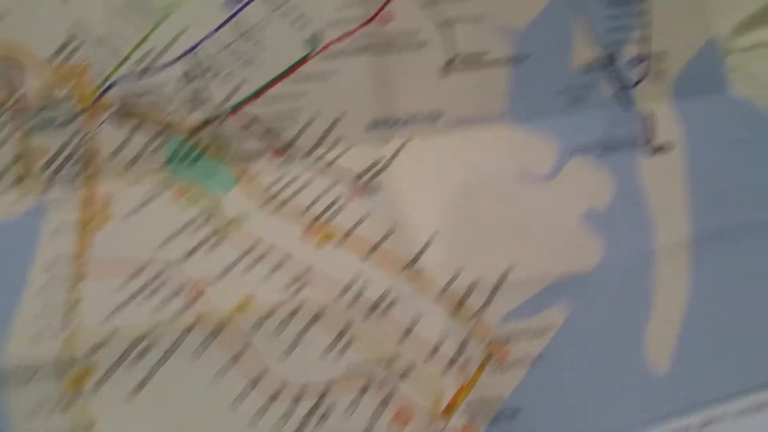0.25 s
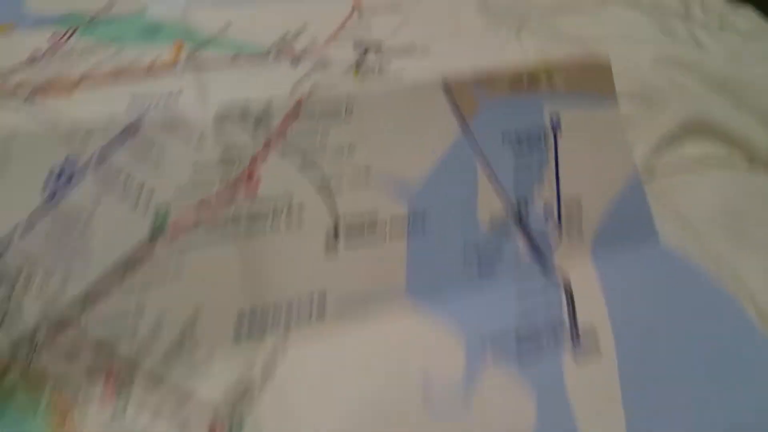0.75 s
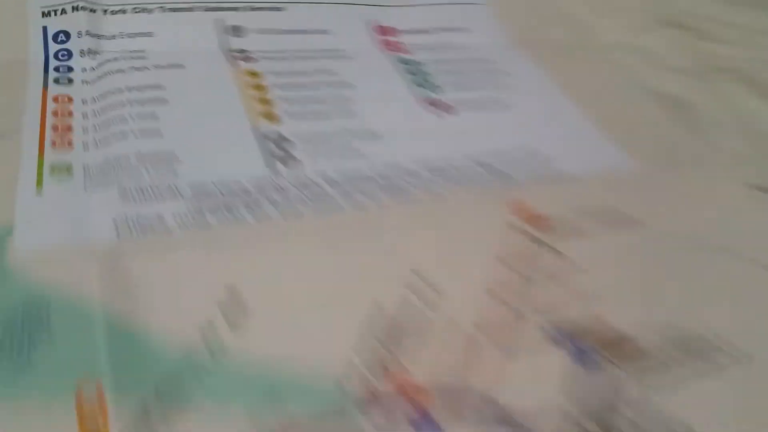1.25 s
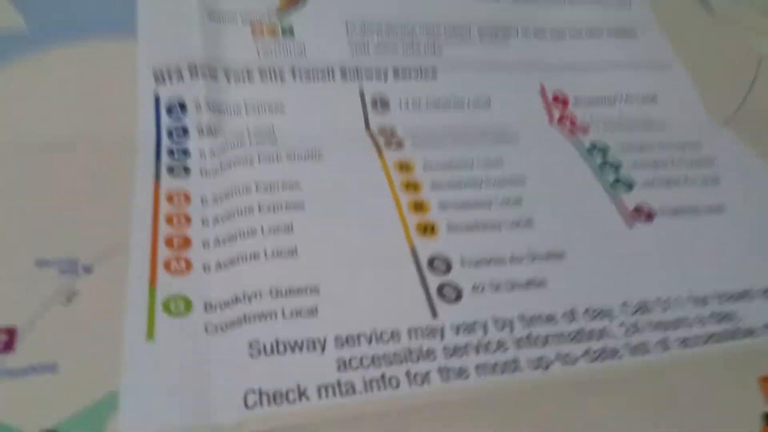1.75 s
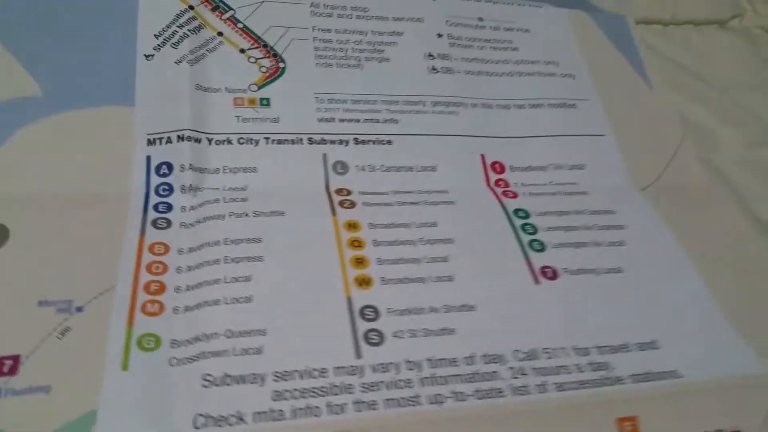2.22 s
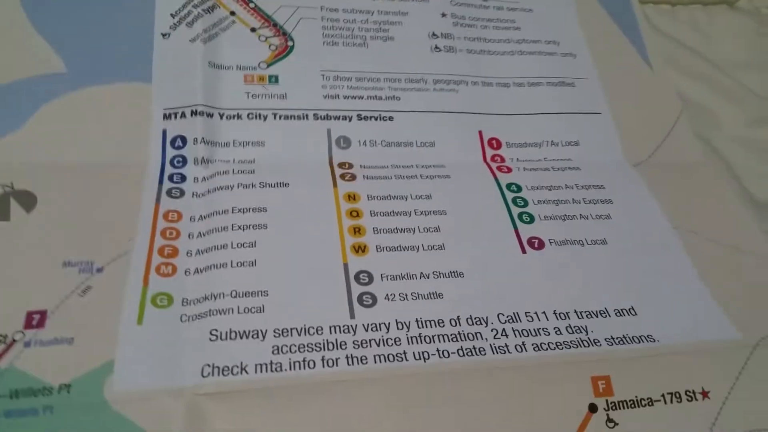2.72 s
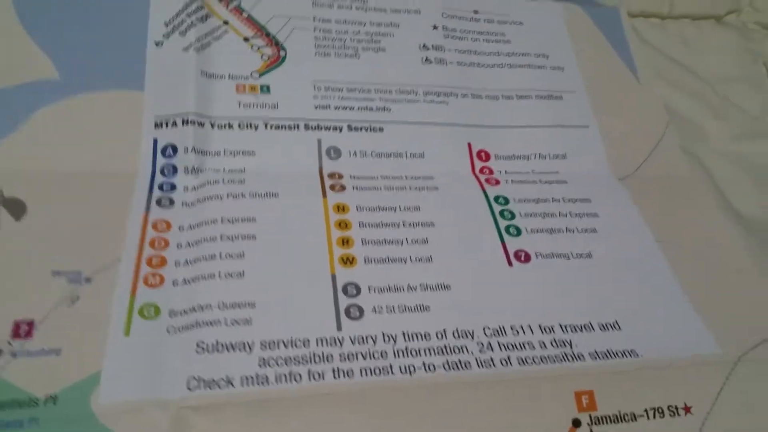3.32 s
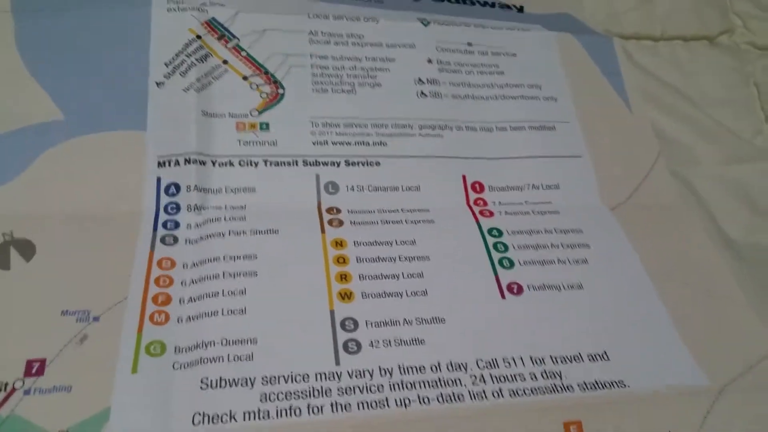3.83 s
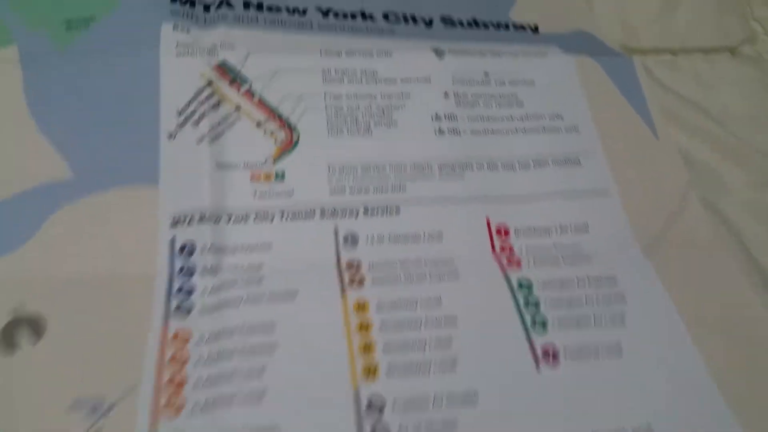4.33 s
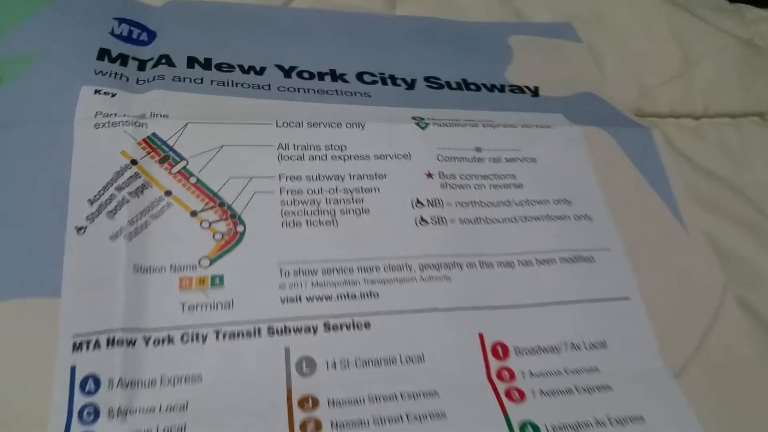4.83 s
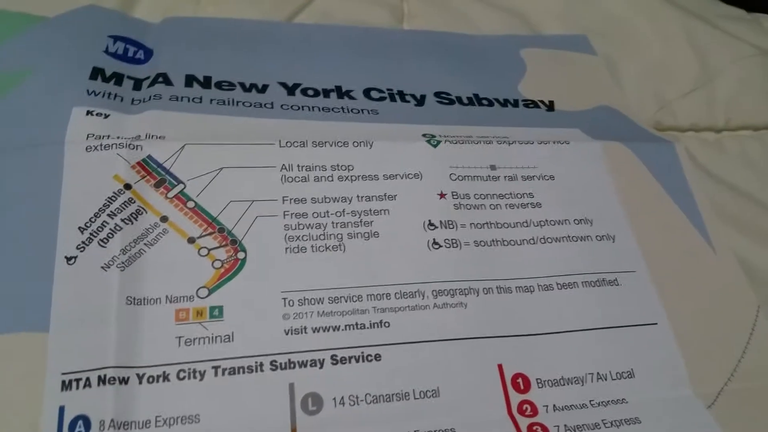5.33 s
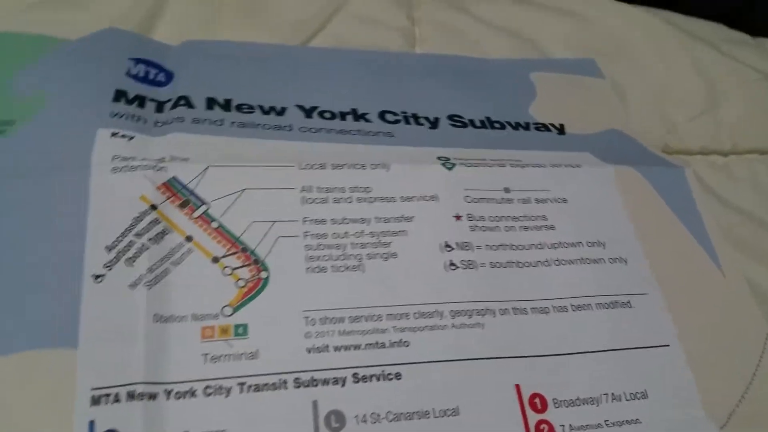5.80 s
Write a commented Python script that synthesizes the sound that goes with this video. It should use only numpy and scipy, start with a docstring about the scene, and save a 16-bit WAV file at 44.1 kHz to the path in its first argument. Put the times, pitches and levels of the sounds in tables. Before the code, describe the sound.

Close paper handling: a burst of loud crease pops, crinkles and sliding sheet, fading to occasional small ticks over a faint low room rumble.

```python
"""Creases snap over in large folded paper maps moved about on a bed, close by in a quiet room.
Each snap is one damped pulse followed by a shiver of filtered random slips.
Panels rustle as avalanches of small buckles that ring the sheet, and sheet slides on sheet by catching
and slipping. Hands and paper bump the quilt as low damped pulses. A soft room and a faint background,
low rumble with a little hiss, surround the paper."""
import sys
import numpy as np
from scipy import signal
from scipy.fft import rfft, irfft, next_fast_len
from scipy.io import wavfile

SR = 44100
rng = np.random.default_rng(int(sys.argv[2]) if len(sys.argv) > 2 else 0)


def unload_wav(signal):
    """Save mono or channel-first audio to the path in sys.argv[1] as 16-bit WAV at rate SR, clipped to [-1, 1]."""
    wavfile.write(
        sys.argv[1],
        SR,
        np.round(np.clip(np.atleast_2d(signal).T, -1, 1) * 32767).astype(np.int16),
    )


N = 267290  # length [samples]


def amp(db):
    """Level to amplitude: 20 dB is a factor of ten."""
    return 10 ** (np.asarray(db) / 20)


def unit(x):
    """Normalization of mean power: scales to rms 1."""
    return x / np.sqrt(np.mean(x ** 2) + 1e-30)


def read(points, hz):
    """Logarithmic pitch scale: interpolates a table over log frequency."""
    f, value = np.transpose(points)
    return np.interp(np.log(hz + 1), np.log(f + 1), value)


def add(mix, s, sound):
    """Superposition: adds a stereo sound to the mix from time s."""
    part = mix[:, max(round(s * SR), 0):]
    part = part[:, :sound.shape[1]]
    part += sound[:, :part.shape[1]]


def filtered(x, response):
    """Linear filtering: multiplies the spectrum by a response given as a function of Hz."""
    count = x.shape[-1]
    size = next_fast_len(count)
    f = np.fft.rfftfreq(size, 1 / SR) + 1e-6  # keeps clear of division by zero
    return irfft(rfft(x, size) * response(f), size)[..., :count]


def resonance(f, hz, q):
    """Damped oscillator: response with gain 1 at its centre."""
    return 1 / (1 + 1j * q * (f / hz - hz / f))


def lowpass(f, hz, q):
    """Mass on a damped spring: response falls by 12 dB per octave well above hz."""
    return 1 / (1 - (f / hz) ** 2 + 1j * f / hz / q)


def band(x, hz, q):
    """Cascaded resonance: the same oscillator twice, for steeper skirts."""
    return filtered(x, lambda f: resonance(f, hz, q) ** 2)


def pulse(hz, q, size=8192):
    """Impulse response: one damped push of air with peak 1."""
    push = band(signal.unit_impulse(size), hz, q)
    return push / abs(push).max()


def grains(count, per_s, spread_db, same):
    """Stick-slip shot noise: random slips of uneven size; two channels share the power fraction same."""
    chance = rng.uniform(-1, 1, (3, count)) * SR / per_s
    hit = abs(chance) < 1
    size_db = spread_db * np.minimum(-np.log(abs(chance[hit])), 4)
    slips = np.zeros((3, count))
    slips[hit] = np.sign(chance[hit]) * amp(size_db)
    same = np.clip(same, 0, 1)
    return np.sqrt(same) * slips[0] + np.sqrt(1 - same) * slips[1:]


def placed(x, side, shade_db=0.4):
    """Interaural cues for two microphones: the nearer hears a sound earlier and louder."""
    full_delay = 0.00039  # between the microphones, for a sound fully to one side [s]
    lead = np.array([[1], [-1]]) * side  # left, right
    delay = full_delay / 2 * (abs(side) - lead)
    return amp(lead * shade_db) * filtered(x, lambda f: np.exp(-2j * np.pi * f * delay))


def mirrored(x, echo_db):
    """Comb filtering: two nearby panels return the sound within milliseconds and ripple its spectrum."""
    delays = rng.uniform(0.001968, 0.014, 2)
    return filtered(x, lambda f: 1 + amp(echo_db) * sum(np.exp(-2j * np.pi * f * d) for d in delays))


def envelope(t, attack, end, release):
    """Exponential decay: rises smoothly from time 0, holds until end, then fades by e per release."""
    rise = np.sin(np.pi / 2 * np.clip(t / attack, 0, 1)) ** 2
    return rise * np.exp(-np.maximum(t - end, 0) / release)


def quiet():
    """Spatial coherence: low rumble of the building is alike at both microphones, their hiss is not."""
    # background spectrum: (frequency [Hz], relative density [dB per Hz])
    spectrum = [(10, -25), (25, -13), (40, -16.5), (70, -4), (115, -1), (160, -9), (300, -11.5),
                (600, -18.5), (1000, -22), (2000, -25), (4800, -31.5), (7200, -30.5), (8300, -35),
                (15500, -36)]
    # left-right likeness: (frequency [Hz], correlation [1])
    coherence = [(40, 1), (200, 0.92), (600, 0.4), (1500, 0.022), (8000, 0.029)]
    left, other = rng.standard_normal((2, N))

    def same(f):
        """Coherence: correlation of the two channels at f."""
        return np.clip(read(coherence, f), -1, 1)

    right = filtered(left, same) + filtered(other, lambda f: np.sqrt(1 - same(f) ** 2))
    noise = unit(filtered(np.array([left, right]), lambda f: amp(read(spectrum, f))))
    return amp(-62.8) * amp([[1], [-0.6]]) * noise  # left a little louder


def room(x):
    """Reverberant decay: sparse reflections in a small, soft room, with the lowest bass lingering longest."""
    # reverberation: (frequency [Hz], time to fall by 60 dB [s])
    decay = [(100, 1), (500, 0.16), (2000, 0.25), (6000, 0.28), (15000, 0.32)]
    count = SR // 2
    signs = rng.choice([-1., 1.], (2, count))
    present = rng.random((2, count)) < 3000 / SR  # reflections per second
    taps = signs * present * (np.arange(count) > 0.005 * SR)  # none in the first 5 ms
    hz, t, z = signal.stft(taps, SR, nperseg=256)
    fading = amp(-60 * t / read(decay, hz)[:, None])
    tail = signal.istft(z * fading, SR, nperseg=256)[1]
    return signal.fftconvolve(x, tail / np.linalg.norm(tail[0]), axes=1)[:, :N]


def bumps():
    """Damped impact: hands and paper land on the quilt with a dull push, its treble absorbed."""
    # pushes before the quilt: (time [s], peak level [dB], centre frequency [Hz])
    pushes = [(0.072, -44.5, 149), (0.693, -50.5, 258), (0.726, -51, 207), (0.872, -40, 175),
              (0.942, -42.5, 158), (0.968, -43, 105), (1.068, -41, 130), (1.092, -48, 80),
              (1.259, -37, 126), (4.008, -47, 148), (4.028, -47, 145), (4.042, -44, 150), (5.46, -55, 115)]
    out = np.zeros((2, N))
    for s, peak_db, hz in pushes:
        add(out, s, placed(amp(peak_db) * pulse(hz, q=0.92), side=0.37))
    return filtered(out, lambda f: lowpass(f, hz=533, q=1))


def slide():
    """Stick-slip friction: fibres catch and slip; each stroke's level changes evenly in dB."""
    # strokes of sheet over sheet: (start [s], length [s], relative level at the end [dB],
    # swell from start to end [dB], brightness [dB])
    strokes = [ (0.482, 0.17, -73.5, 13, -12.5), (0.788, 0.28, -57.5, 18, -8.5),
               (1.072, 0.26, -47.5, -1.5, 2.8), (1.356, 0.16, -62, 8, -9), (1.446, 0.036, -47, 7, -10),
               (1.504, 0.34, -49.5, 1.5, 1.5), (1.867, 0.33, -53.5, -2, 2), (2.202, 0.385, -63.5, -2.5, 4),
               (5.92, 0.12, -68.5, 0, 8)]
    attack, release = 0.023, 0.016  # [s]
    rub_db, fizz_db = -2.5, -7  # against the hiss, at brightness 0
    t = np.arange(N) / SR
    rub, hiss, fizz = np.zeros((3, 2, N))
    for s, length, level_db, swell_db, bright_db in strokes:
        progress = np.clip((t - s) / length, 0, 1)
        drive = amp(level_db + swell_db * (progress - 1)) * envelope(t - s, attack, length, release)
        # a brighter stroke trades dull rub for fine fizz
        rub += drive * amp(rub_db - bright_db)
        hiss += drive
        fizz += drive * amp(fizz_db + bright_db)
    rub *= unit(band(grains(N, per_s=4500, spread_db=3.5, same=0.37), 1670, q=0.32))
    hiss *= unit(band(grains(N, per_s=4200, spread_db=1.0, same=0.22), 4080, q=0.75))
    fizz *= unit(band(grains(N, per_s=12000, spread_db=8.0, same=0.12), 13400, q=0.52))
    return amp(-3.5) * placed(mirrored(rub + hiss + fizz, echo_db=-14.5), side=0.55)


def sheet(f):
    """Modal superposition: resonances of the spread-out sheet, neighbours swinging in opposite senses."""
    # sheet modes: (frequency [Hz], level [dB])
    modes = [(275, 5), (314, 6.5), (355, 2.5), (402, 4), (440, -24), (522, -4.5), (588, -16), (677, -22.5),
             (720, -1), (777, -4.5), (852, -12), (928, -15.5), (1020, 5.5), (1167, -1.5), (1371, 10),
             (1527, 9), (1686, 5), (1773, 5)]
    width_hz, plain_db = 25, -4  # width of each mode; share that leaves without ringing
    ring = 0
    for k, (hz, db) in enumerate(modes):
        ring = ring + (-1) ** k * amp(db) * resonance(f, hz, q=hz / width_hz)
    return 1j * amp(plain_db) + ring


def rustles():
    """Avalanche of buckling: a bending panel gives pushed air, a hollow body and a bright crinkle."""
    # bending panels, and at 0.900 and 0.985 s the narrow rubbing pitch of the sliding sheet: (start [s], fade
    # time constant [s], body centre [Hz], body level [dB], # crinkle centre [Hz], crinkle level [dB], crinkle Q
    # [1], side [negative right, positive left])
    bends = [ (0.032, 0.088, 660, -55, 3150, -53.5, 0.86, -1.08),
             (0.603, 0.14, 397, -66, 1900, -65.5, 0.2, 0.29),
             (0.794, 0.087, 1290, -63, 1540, -56, 0.54, 0.37),
             (0.900, .15, 1090, -63, 2070, -63, 4.5, 0.56), (0.985, 0.17, 600, -62, 2040, -54.5, 2.8, 0.61),
             (1.064, 0.053, 795, -43, 6000, -47.5, 1.2, 0.69),
             (1.085, 0.019, 800, -38, 1500, -53, .85, 0.66),
             (1.220, 0.035, 820, -38, 1730, -40.5, 1.3, 0.23),
             (1.439, 0.1, 670, -31.5, 2040, -38.5, 0.81, -0.8),
             (1.522, 0.064, 790, -35, 1760, -39, 1.8, -0.91),
             (1.605, .054, 764, -53, 5000, -37.5, 1.5, -0.81),
             (1.742, 0.049, 644, -54, 1900, -52, 0.58, 0.52),
             (2.056, 0.03, 446, -52.5, 2600, -55.5, 0.6, 0.56),
             (2.099, 0.074, 610, -59.5, 5400, -45.5, 2, 0.5), (2.141, 0.024, 800, -37, 2500, -42, 1, 0.83),
             (2.158, 0.022, 437, -34.5, 2780, -35, 1.5, -0.36),
             (2.612, .06, 730, -69, 3000, -59, 0.58, -0.25),
             (2.760, 0.065, 680, -53, 2870, -45.5, 1.5, -0.9),
             (3.461, 0.065, 810, -72, 3300, -63, .5, -0.2), (3.641, 0.017, 400, -63.5, 900, -80, 1.2, .85),
             (3.711, .012, 380, -49.5, 2860, -50, 0.94, 0.21),
             (3.863, 0.034, 594, -68, 2680, -61.5, 1.7, -0.29),
             (3.894, 0.028, 460, -52.5, 1950, -58.5, 0.65, 0.042),
             (3.968, 0.066, 650, -62, 2500, -63.5, 0.39, 0.78),
             (4.040, 0.0085, 394, -44, 2620, -46, 1.6, 0.74), (4.441, 0.071, 400, -67, 2600, -61, .6, 0.72),
             (4.797, 0.079, 570, -72, 2000, -80, .5, -0.58),
             (5.071, 0.044, 350, -53, 5030, -47.5, .7, 0.88),
             (5.080, 0.063, 880, -55.5, 1960, -53.5, 1.05, 0.79),
             (5.732, 0.053, 1040, -55, 4200, -53.5, 2.1, -0.84),
             (5.811, 0.011, 650, -62, 1380, -61, .8, -0.23)]
    out = np.zeros((2, N))
    t = np.arange(SR // 2) / SR
    count = len(t)
    ring = filtered(signal.unit_impulse(count), sheet)[None, :count // 2]
    for s, fade, body_hz, body_db, crinkle_hz, crinkle_db, crinkle_q, side in bends:
        rise = 0.18 * fade
        swell = envelope(t, rise, rise, fade)
        air_db = -58.5 + 0.4 * (body_db + 51)  # air follows the body by 0.4 dB per dB
        air = unit(band(grains(count, per_s=2700, spread_db=3.5, same=1.0), 150, q=1.22))
        buckles = band(grains(count, per_s=1400, spread_db=2.5, same=0.97), body_hz, q=0.84)
        body = unit(irfft(rfft(buckles) * rfft(ring, count), count))  # rung by the sheet
        crinkle = band(grains(count, per_s=1900, spread_db=2.5, same=0.15), crinkle_hz, q=crinkle_q)
        crinkle = unit(mirrored(crinkle, echo_db=-13.5))
        add(out, s, placed(swell * (amp(air_db) * air + amp(body_db) * body), side))
        add(out, s, placed(swell * amp(crinkle_db) * crinkle, side, shade_db=0.7))
    return out


def snaps():
    """Snap-through instability: a strained crease pops over with one pulse and its panel shivers."""
    # creases: (time [s], pitch [Hz], pop level [dB], shiver level [dB], side [-1 right to 1 left])
    creases = [ (1.0914, 740, -18.5, -42, .5), (1.1950, 1100, -37, -38, 0.22),
               (1.2063, 920, -29, -29.5, 0.44), (1.234, 1010, -26, -45, 0.73),
               (1.2380, 675, -22.5, -39, 0.92), (1.2594, 1800, -10, -19.5, 1),
               (1.2802, 1580, -23.5, -30.5, 0.97), (1.7814, 1000, -26.5, -34, 0.37),
               (1.9596, 703, -31.5, -71, 0.55), (2.153, 3930, -22, -22, 0.93),
               (2.1550, 2640, -37, -22.5, -0.11), (2.3372, 515, -50, -54, 0.47),
               (3.7127, 1200, -36, -34.5, 0.79), (3.8939, 840, -36.5, -44, -0.27),
               (4.0418, 970, -37, -40, 0.47), (4.4431, 1440, -46, -38.5, 0.79),
               (4.4471, 460, -35, -49, 0.24)]
    out = np.zeros((2, N))
    lead = 2 ** 8  # samples ahead of the pop
    t = (np.arange(2 ** 12) - lead) / SR
    strain = np.exp(np.minimum(t - 0.0005, 0) / 0.00016)  # builds up until 0.5 ms after the pop starts
    for s, hz, pop_db, shiver_db, side in creases:
        shiver_hz = 1.26 * hz
        fade = 4.63 / hz  # cycles of the crease's pitch: a higher crease dies sooner
        pop = amp(pop_db) * np.roll(pulse(hz, q=0.55, size=len(t)), lead)
        shiver = band(grains(len(t), per_s=7800, spread_db=-3.5, same=0.99), shiver_hz, q=0.35)
        # the stiff panel radiates little above 3 kHz
        shiver = filtered(shiver, lambda f: lowpass(f, hz=3000, q=0.96))
        shiver = unit(mirrored(shiver, echo_db=-7.5))
        shiver = amp(shiver_db) * shiver * strain * np.exp(-np.maximum(t, 0) / fade)
        add(out, s + t[0], placed(pop, side, shade_db=7) + placed(shiver, side))
    return out


def scene():
    """Superposition: paper sounds pass through one microphone colour, then join room and background."""
    # colour of the microphones, applied to the paper sounds: (frequency [Hz], gain [dB])
    microphone_colour = [(40, 5.5), (200, 4), (1000, 4), (3000, -2), (4000, -5), (5500, -4), (7000, -1.5),
                         (7600, -5), (8300, -9), (11000, -5), (16000, -9)]
    dry_paper = snaps() + rustles() + bumps() + slide()
    paper = filtered(dry_paper, lambda f: amp(read(microphone_colour, f)))
    return paper + amp(-12.5) * room(paper) + quiet()


def record(dry):
    """Frequency response: the two microphones differ a little in colour, then the band is limited."""
    # microphone balance: (frequency [Hz], left minus right [dB])
    balance = [(60, 0.5), (300, 1), (1500, -1.5), (2500, -0.7), (4000, -1.5), (6400, -1.5), (10000, 0.9)]
    halves = np.array([[0.5], [-0.5]])  # left, right
    heard = filtered(dry, lambda f: amp(halves * read(balance, f)))
    band_limit = signal.firwin(511, 15850, window=("kaiser", 9), fs=SR)  # cutoff in Hz
    return signal.oaconvolve(heard, band_limit[None], "same")


dry = scene()
out = record(dry)
unload_wav(out)
```